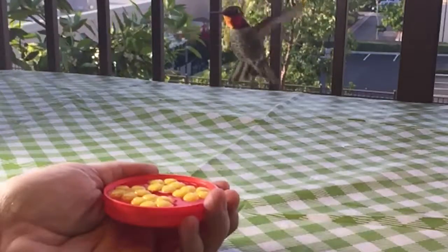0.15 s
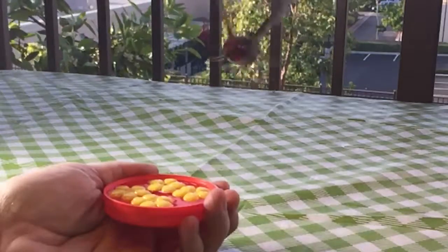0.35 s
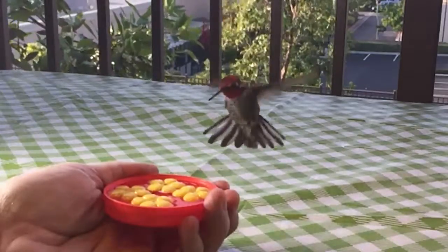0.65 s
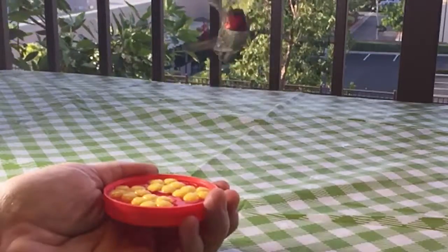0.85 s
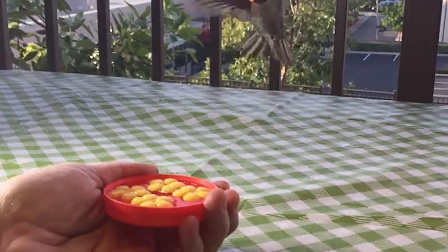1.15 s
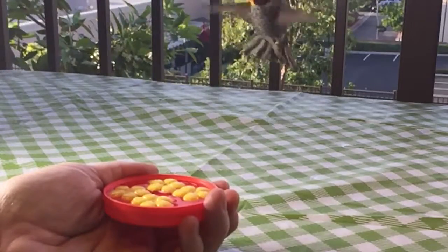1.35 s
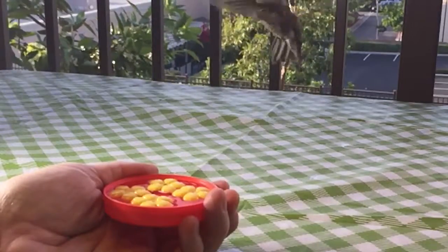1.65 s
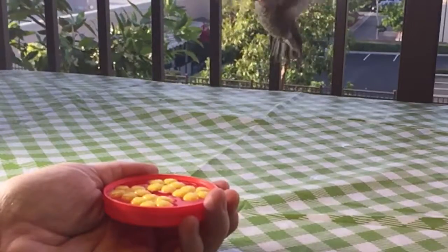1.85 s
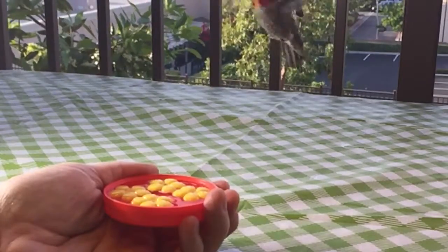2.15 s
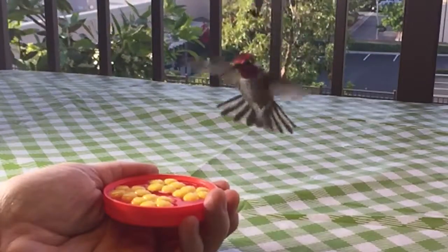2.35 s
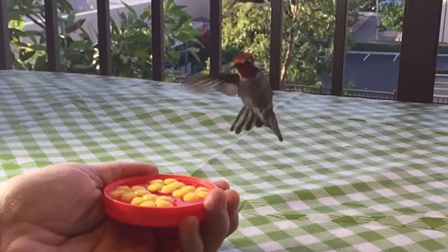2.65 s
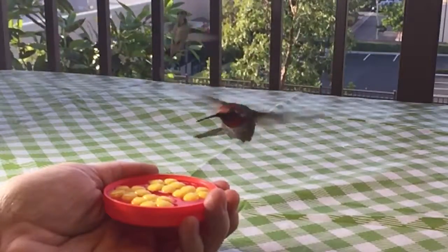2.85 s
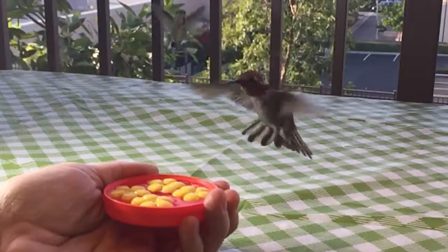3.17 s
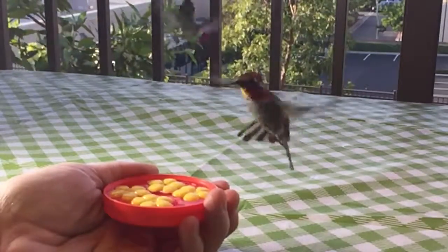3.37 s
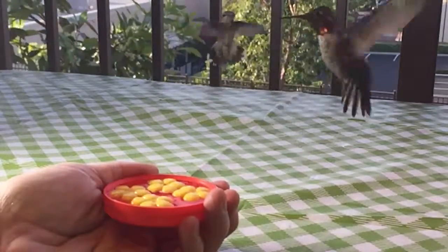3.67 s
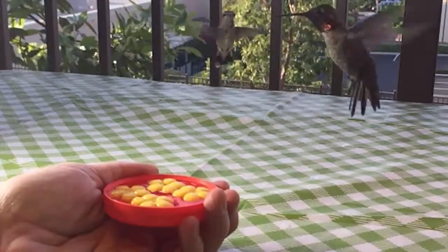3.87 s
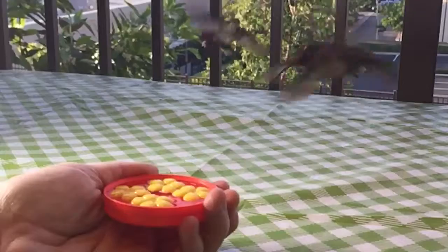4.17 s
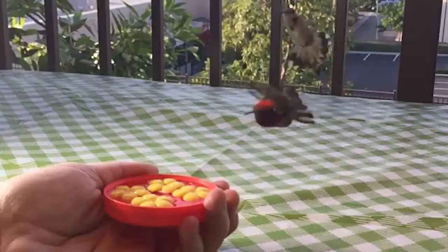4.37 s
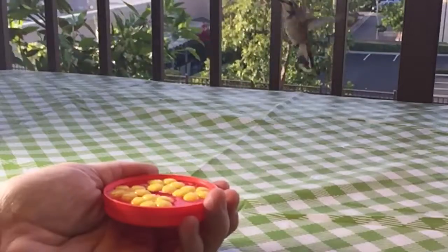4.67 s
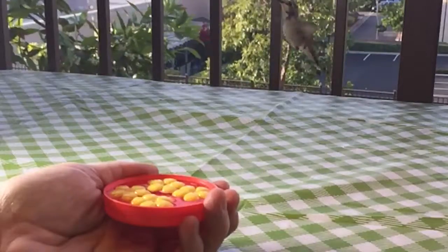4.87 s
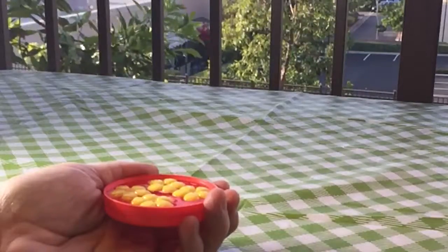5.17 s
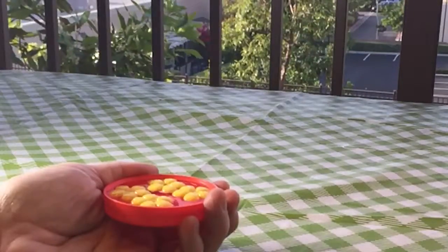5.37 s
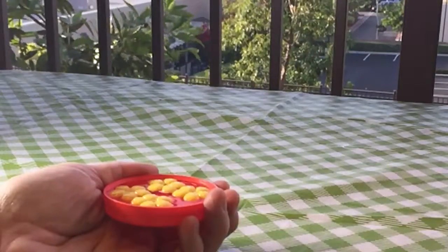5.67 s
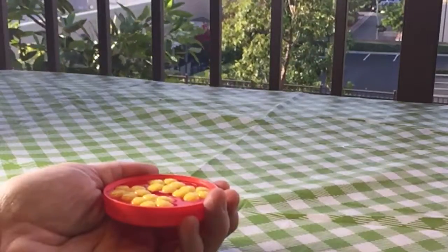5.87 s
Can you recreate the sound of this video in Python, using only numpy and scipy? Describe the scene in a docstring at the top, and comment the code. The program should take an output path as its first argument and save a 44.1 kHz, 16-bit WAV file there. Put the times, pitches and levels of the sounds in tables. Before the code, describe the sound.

Two hummingbirds hover close to the microphone on a balcony, their wings making a low, throbbing hum that swells and fades for all six seconds. They give very short, sharp, falling chips with a slight echo: three in the first half second, a few softer ones after that, then strong ones at about 2.3 and 2.8 seconds and a weaker one at 3.5. Hard turns throw brief thumping flutters and puffs of air between 0.5 and 1 second, and near 2.4, 3 and 3.6 seconds. The loudest chip comes at 4.3 seconds, followed by a dry feather tick and a fluttering whoosh as one bird darts past, peaking around 4.5. Two more flutters follow just after 5 seconds, and the hum turns a little buzzier. Distant traffic rumbles softly throughout, with very faint songbird peeps in the last second.

```python
"""A sharp chip and a hum of wings, right at the microphone: two hummingbirds spar over a hand-held
feeder on a balcony table. Each wing stroke pushes the air and makes the hum; hard turns throw
thumps and puffs of air, and one bird darts past with a whoosh. They scold with very short falling
whistles that echo off the table and walls. Distant traffic and a far songbird lie behind."""
import sys
import numpy as np
from scipy import signal
from scipy.fft import rfft, irfft, next_fast_len
from scipy.io import wavfile
from scipy.ndimage import uniform_filter1d, map_coordinates

SR = 44100
rng = np.random.default_rng(int(sys.argv[2]) if len(sys.argv) > 2 else 0)


def wav_out(sig):
    """Save sig, one row per channel (or a flat mono array), as 16-bit PCM at SR to the path in sys.argv[1]."""
    wavfile.write(sys.argv[1], SR, np.round(np.clip(np.atleast_2d(sig).T, -1, 1) * 32767).astype(np.int16))


N = 265305

# Distant streets, heard from the balcony. Each row: time in seconds, level in dB.
STREET_LEVEL = [(0, -47.5), (1.7, -50), (3.1, -49), (4.2, -48.5), (4.9, -49), (6.02, -49.5)]
# A far songbird. Each row: start in seconds, length in seconds, mid pitch in Hz, relative level in dB.
PEEPS = [(5.257, 0.022, 3500, -70), (5.368, .03, 4000, -71), (5.665, 0.025, 3750, -69),
         (5.745, .022, 3680, -72), (5.83, 0.02, 4000, -65.5)]
# The balcony's echo. Each row: frequency in Hz, seconds to die away by 60 dB.
BALCONY_T60 = [(300, 0.16), (4000, 0.33), (8000, 0.23), (15000, 0.13)]

# Spectra. Each row: frequency in Hz, relative level per Hz in dB.
TRAFFIC_SPECTRUM = [(20, -30), (33, -33), (50, -5), (100, -1), (200, 1.5), (310, -2), (430, -12.5),
                    (540, -14), (760, -12.5), (1000, -10.5), (1650, -18), (2500, -30.5), (4000, -35.5),
                    (6300, -40.5), (10000, -43), (15000, -45)]  # rumble and tyre noise
EDDY_SPECTRUM = [(20, -38), (35, -4.5), (52, -0.5), (80, 0), (130, 1), (200, 0.5), (320, -6.5), (500, -23),
                 (900, -22.5), (2000, -47), (5000, -54.5)]  # low eddies shed by the wings
SLAP_SPECTRUM = [(150, -27), (300, -0.5), (420, 1.5), (560, -7), (900, -30), (2000, -50)]  # the brighter part of the thrown air
FEATHER_SPECTRUM = [(300, -28), (700, 16.5), (1400, 12.5), (2500, 6), (5000, 1.5), (8500, 2), (10500, -1.5),
                    (15000, -0.5)]  # air swishing through feathers
THUMP_SPECTRUM = [(25, -39), (50, -1), (105, 4), (160, 6), (220, 2), (280, -6), (420, -11.5), (600, -22),
                  (1000, -49), (2500, -79), (6000, -120)]  # a hard wingbeat

# The hovering bird's pace. Each row: time in seconds, strokes a second (two to a wingbeat).
STROKE_RATE = [(0, 97), (.9, 93.5), (1.02, 94.7), (1.3, 94.4), (2.2, 97.4), (2.7, 92.4), (4.2, 93),
               (4.68, 98), (5.2, 94.2), (5.5, 94.3), (6.02, 94.4)]
# Its hum at the microphone. Each row: time in seconds, level in dB.
TONE_LEVEL = [(0, -46), (.09, -38.5), (.55, -44), (.68, -44.5), (.9, -42.5), (1.42, -55), (1.52, -42.5),
              (1.9, -46.5), (2.28, -47), (2.48, -50), (2.65, -45.5), (2.76, -48.5), (3.02, -46), (3.2, -50),
              (3.6, -45), (3.7, -57), (4.35, -52), (4.55, -46), (4.65, -40), (4.76, -58), (5.15, -48.5),
              (5.65, -58.5), (6.02, -48)]  # the stroke tone fades as the bird draws away
OCTAVE_LEVEL = [(0, -49), (.22, -57), (.33, -43), (.45, -58), (.72, -50), (.94, -39), (1.02, -53.5),
                (1.2, -45), (1.4, -44), (1.76, -67.5), (2.08, -45), (2.3, -61), (2.66, -43.5), (2.92, -49),
                (3.152, -57.5), (3.35, -46.5), (3.6, -49.5), (3.75, -57), (4.22, -58), (4.35, -41),
                (4.58, -41), (4.645, -45), (4.71, -36), (4.84, -54.5), (4.98, -41), (5.11, -40.5),
                (5.18, -52), (5.3, -45), (5.5, -49.5), (5.68, -42.5), (5.92, -39.5), (6.02, -43)]  # its octave comes and goes as the bird turns
BUZZ_LEVEL = [(0, -61.5), (1.65, -67), (1.95, -63), (2.25, -61.5), (2.9, -58.5), (4.2, -67), (5.2, -58),
              (5.6, -47.5), (5.88, -57.5), (6.02, -50)]  # the upper buzz
# Sharp turns. Each row: time of the hardest wingbeat in seconds, half length in seconds, wingbeats
# a second, relative levels of thrown air, thump and swish in dB, thump tilt in dB per octave,
# upstroke against downstroke in dB.
SHARP_TURNS = [(0.56, 0.037, 48, -47, -46, -68, -1.5, -18), (0.782, 0.03, 52, -47.5, -38.5, -61, 2.5, -28),
               (.931, 0.04, 55, -43.5, -48, -64.5, 4, -11), (2.388, 0.042, 43.4, -49, -38.5, -68, -5, -15),
               (2.937, 0.038, 52, -49, -36, -62.5, -2, -20), (3.002, 0.022, 46, -71, -36.5, -87, -7, -10),
               (3.579, 0.054, 43.6, -48.5, -44, -71.5, 0.5, -17),
               (3.684, 0.041, 44, -68, -66, -67.5, -2, -10), (5.097, 0.086, 44, -52.5, -53, -71.5, 5, -4),
               (5.275, 0.027, 45.7, -47, -38.5, -77, -3, -10)]
# One bird darts past the feeder. Each row: time in seconds, wingbeats a second, relative levels of
# thrown air, thump and swish in dB, upstroke against downstroke in dB.
DART = [(4.28, 56, -64, -66, -70, 1), (4.385, 57, -48, -44, -61.5, -9), (4.44, 57.5, -42, -35.5, -54.5, -6),
        (4.485, 54, -48, -39, -64, -8.5), (4.53, 52.4, -38, -32.5, -54.5, -16),
        (4.56, 52, -45, -36.5, -58, -10), (4.6, 51, -41.5, -36, -57, -8), (4.68, 54.3, -45, -61, -63.5, -3),
        (4.78, 49.8, -63, -57, -77, -4)]
# Feather flicks. Each row: start in seconds, level in dB.
FLICKS = [(3.428, -55), (4.39, -42.5)]
# A snapped quill's ring. Each row: frequency in Hz, relative level in dB, seconds to fall 60 dB.
QUILL_MODES = [(3540, -4.5, .02), (6030, -7, 0.023), (8900, -10, .012)]
# Scolding chips; overlapping ones are the two sides of the syrinx, or both birds at once.
# Each row: start and length in seconds, top and end pitch in Hz, level in dB, place and width of
# the crest as shares of the length, relative levels of octave, rasp and echo in dB.
CHIPS = [(-.002, 0.014, 9780, 3500, -36.5, 0.54, 0.47, -9, -15, -16),
         (0.118, 0.011, 9680, 4620, -30.5, 0.53, 0.26, -15, -28, -17.5),
         (0.4727, 0.0091, 10100, 3200, -26.5, 0.47, 0.47, -13, -20, -16.5),
         (0.6875, 0.013, 7400, 2780, -49, 0.66, 0.45, -15, -9, -7),
         (1.367, 0.011, 6560, 3507, -45.5, 0.55, 0.38, -17, -8.5, -15.5),
         (1.962, 0.01, 6630, 2700, -41.5, 0.5, 0.2, -20, -13.5, -15),
         (2.3252, 0.0099, 10050, 3740, -23.5, 0.57, 0.26, -9, -28, -16),
         (2.6572, 0.0112, 7300, 3580, -44, 0.6, 0.35, -14, -15, -12),
         (2.8302, 0.0084, 9365, 3950, -27, 0.61, 0.42, -11, -18, -15.5),
         (2.8306, 0.0079, 11200, 6260, -39, 0.2, 0.3, -30, -23, -17),
         (3.4612, 0.0096, 7440, 3600, -38.5, 0.5, 0.5, -9, -20, -13.5),
         (4.2784, 0.0093, 9796, 3480, -18.5, 0.74, 0.07, -8.5, -27, -17),
         (4.2788, 0.0077, 11930, 5700, -29.5, 0.63, 0.55, -30, -23, -13),
         (4.288, 0.0102, 7100, 3330, -41, 0.8, 0.8, -22, -25, -21)]

FLUTTER_DB, RUSTLE_DB = 1.0, 1.0  # quick unevenness of the strokes and of the swish


def amp(db):
    """Decibels to gain."""
    return 10 ** (np.asarray(db) / 20)


def unit(x):
    """Scale to rms 1."""
    return x / np.sqrt(np.mean(x ** 2) + 1e-20)


def along(points, hz):
    """Read (Hz, value) points on a log frequency axis."""
    knots_hz, values = np.transpose(points)
    return np.interp(np.log(hz + 1), np.log(knots_hz + 1), values)


def curves(rows):
    """One value per sample for each column after the time."""
    times, *columns = np.transpose(rows)
    return [np.interp(np.arange(N) / SR, times, column) for column in columns]


def wobble(rate):
    """A smooth random curve, rate knots a second."""
    return map_coordinates(rng.standard_normal(int(N * rate / SR) + 4), [np.arange(N) * rate / SR])


def filtered(x, response):
    """Filter x by a gain that is a function of frequency."""
    size = next_fast_len(N + SR // 2)
    return irfft(rfft(x, size) * response(np.fft.rfftfreq(size, 1 / SR)), size)[:N]


def coloured(x, spectrum):
    """Shape x by a spectrum, at rms 1."""
    return unit(filtered(x, lambda hz: amp(along(spectrum, hz))))


def phase_of(hz):
    """Running phase in radians."""
    return 2 * np.pi * np.cumsum(hz) / SR


def highpass(x, order, hz):
    """Cut the lows below hz."""
    return signal.sosfilt(signal.butter(order, hz, "high", fs=SR, output="sos"), x)


def add(track, start_s, sound):
    """Mix a sound into the track."""
    at = round(start_s * SR) + np.arange(len(sound))
    inside = (at >= 0) & (at < N)
    track[at[inside]] += sound[inside]


def traffic():
    """Rumble and tyre noise of distant streets, drifting in patches."""
    bands = signal.stft(rng.standard_normal(N), nperseg=1024)[2]
    patches = uniform_filter1d(rng.standard_normal(bands.shape), size=3, axis=0)
    patch_db = 1.7 * unit(uniform_filter1d(patches, size=5, axis=1))
    noise = signal.istft(bands * amp(patch_db), nperseg=1024)[1][:N]
    level_db = curves(STREET_LEVEL)[0] + 0.6 * wobble(9)
    return amp(level_db) * coloured(noise, TRAFFIC_SPECTRUM)


def wall_echo():
    """The balcony's diffuse tail, at energy 1; each frequency dies at its own speed."""
    hz, t, bands = signal.stft(rng.standard_normal(SR // 2), SR, nperseg=256)
    decay = amp(-60 * t / along(BALCONY_T60, hz)[:, None])
    tail = signal.istft(bands * decay, SR, nperseg=256)[1]
    return unit(tail) / np.sqrt(len(tail))


def balcony(call, echo_db, scatter_t60_s=0.05):
    """Table and railing throw a call back at once, then the walls answer with a short tail."""
    t = np.arange(SR // 50) / SR
    scatter = rng.standard_normal(len(t)) * amp(-60 * t / scatter_t60_s)
    response = np.zeros(N)
    response[0] = 1  # straight to the microphone
    add(response, rng.uniform(0.0006, 0.0021), amp([-8]))  # one bounce off the table top
    add(response, 0.0005, amp(-13.5) * scatter / np.linalg.norm(scatter))
    add(response, 0.007, amp(echo_db) * wall_echo())
    return signal.fftconvolve(call, response[:SR // 2])


def songbird(rise=0.18):
    """Faint rising peeps from far off, as much echo as direct sound."""
    track = np.zeros(N)
    for start_s, length_s, hz, db in PEEPS:
        progress = np.linspace(0, 1, int(length_s * SR))
        phase = phase_of(hz * (1 + rise * (progress - 0.5)))
        add(track, start_s, amp(db) * np.sin(np.pi * progress) * np.sin(phase))
    return amp(-4) * (track + signal.fftconvolve(track, wall_echo())[:N])


def downwash(stroke_phase, leave_s=4.64, fade_db_per_s=6):
    """Each hovering wingbeat sheds eddies and a faint swish, which fades as the birds rise away."""
    gone_s = np.maximum(np.arange(N) / SR - leave_s, 0)
    wingbeat = np.abs(np.cos(stroke_phase / 4)) ** 4  # crests every second stroke
    eddies = coloured((1.1 + wingbeat) * rng.standard_normal(N), EDDY_SPECTRUM)
    rustle = amp(RUSTLE_DB * wobble(70)) * rng.standard_normal(N)
    swish = coloured((2.1 + wingbeat) * rustle, FEATHER_SPECTRUM)
    return amp(-52.5 + 0.52 * wobble(6.15)) * eddies + amp(-70.5 - fade_db_per_s * gone_s) * swish


def feather_flicks(tick_t60_s=0.0071):
    """Dry ticks of feathers snapping against each other, with a tiny ring of the quill."""
    track = np.zeros(N)
    t = np.arange(SR // 50) / SR
    ring = sum(amp(db - 60 * t / t60) * np.sin(2 * np.pi * hz * t) for hz, db, t60 in QUILL_MODES)
    for start_s, db in FLICKS:
        tick = amp(-60 * t / tick_t60_s) * rng.standard_normal(len(t))
        add(track, start_s, amp(db) * (ring + tick))
    return track


def partial(phase, db, waver_db):
    """One harmonic of a wing hum; it wavers as the bird bobs, and no two strokes are equal."""
    return np.sqrt(2) * amp(db + waver_db * wobble(12) + FLUTTER_DB * wobble(40)) * np.cos(phase)


def rival_hum(stroke_hz=104.1, drift=0.0249):
    """The second bird beats a little faster, so the two hums throb against each other."""
    phase = phase_of(stroke_hz * (1 + drift * wobble(6)))
    return (partial(phase, -57.5, waver_db=1.5)
            + partial(2 * phase, -60.5, waver_db=3.5)
            + partial(3 * phase, -80, waver_db=6.5))


def wing_hum(stroke_phase):
    """Close by, each fore and back stroke pushes the air once, giving a tone and its overtones."""
    tone_db, octave_db, buzz_db = (curves(rows)[0] for rows in (TONE_LEVEL, OCTAVE_LEVEL, BUZZ_LEVEL))
    return (partial(stroke_phase, tone_db, waver_db=1.5)
            + partial(2 * stroke_phase, octave_db, waver_db=1.8)
            + partial(3 * stroke_phase, buzz_db, waver_db=1.5)
            + partial(4 * stroke_phase, buzz_db - 9, waver_db=5)
            + partial(5 * stroke_phase, buzz_db - 19.5, waver_db=3.5))


def wing_thumps(beats, tilt_db, upstroke_db):
    """Hard wingbeats at rms 1: a thump on each downstroke and another on the upstroke between."""
    down, up = (np.diff(np.floor(count), prepend=np.floor(count[0])) for count in (beats, beats + 0.5))
    pushes = -(down + amp(upstroke_db) * up)
    colour = lambda hz: amp(along(THUMP_SPECTRUM, hz) + tilt_db * np.log2(np.clip(hz, 50, 400)))
    return unit(filtered(pushes, colour))


def pulsing(cycles, depth):
    """A gain of rms 1 that peaks once a cycle."""
    return unit(1 + depth * np.exp(-2 * (1 - np.cos(2 * np.pi * cycles))))


def sharp_turns(recovery=1.08, steepness=1.63, swish_lead_s=0.0047):
    """Each turn builds fast and eases a little more slowly. Gives thumps, air gain and swish gain."""
    t = np.arange(N) / SR
    thumps, air_gain, swish_gain = np.zeros((3, N))
    for peak_s, half_s, rate, air_db, thump_db, swish_db, tilt_db, upstroke_db in SHARP_TURNS:
        offset = (t - peak_s) / half_s
        from_peak = np.where(offset < 0, -offset, offset / recovery)
        effort = np.exp(-np.minimum(from_peak, 10) ** steepness)
        beats = rate * (t - peak_s)
        strokes = effort * pulsing(beats + rate * swish_lead_s, depth=1.7)
        thumps += amp(thump_db) * effort * wing_thumps(beats, tilt_db, upstroke_db)
        air_gain += amp(air_db) * strokes
        swish_gain += amp(swish_db) * strokes
    return thumps, air_gain, swish_gain


def dart(nearest_s=4.536, jitter=0.035):
    """A bird shoots past the microphone and its hum falls. Gives thumps, air gain and swish gain."""
    t = np.arange(N) / SR
    rate, air_db, thump_db, swish_db, upstroke_db = curves(DART)
    beats = np.cumsum(rate * (1 + jitter * wobble(45))) / SR
    beats -= np.interp(nearest_s, t, beats)  # a downstroke lands at the closest point
    passing = (t > DART[0][0]) & (t < DART[-1][0])
    strokes = passing * pulsing(2 * beats, depth=0.55)  # both strokes swish alike
    thumps = amp(thump_db) * passing * wing_thumps(beats, tilt_db=-0.5, upstroke_db=upstroke_db)
    return thumps, amp(air_db) * strokes, amp(swish_db) * strokes


def flurries():
    """In the turns and the dart, the same wingbeats thump, throw air and swish through the feathers."""
    thumps, air_gain, swish_gain = np.add(sharp_turns(), dart())
    eddies, slap, feathers = (coloured(rng.standard_normal(N), spectrum)
                              for spectrum in (EDDY_SPECTRUM, SLAP_SPECTRUM, FEATHER_SPECTRUM))
    rustle_db = RUSTLE_DB * wobble(70) + 1.9 * wobble(900)  # the barbs add a fine grain
    swish = amp(5) * swish_gain * unit(amp(rustle_db) * feathers)
    thrown_air = air_gain * (eddies + amp(-8) * slap)
    return amp(FLUTTER_DB * wobble(29.86)) * thumps + thrown_air + swish


def chip(length_s, top_hz, end_hz, crest, width, octave_db, rasp_db):
    """A whistle holds briefly, then plunges about an octave; low, soft ones arch up and hold longer."""
    sharp_hz, soft_hz = 9630, 6600
    progress = np.linspace(0, 1, int(length_s * SR))
    softness = np.clip((sharp_hz - top_hz) / (sharp_hz - soft_hz), 0, 1)
    hold = 2.19 + 1.04 * softness  # the lower, the later the pitch drops
    plunge_hz = top_hz + (end_hz - top_hz) * progress ** hold
    scoop = 1 - 0.11 * softness * np.exp(-progress / 0.17)
    phase = phase_of(plunge_hz * scoop)
    edges = np.clip(progress / 0.17, 0, 1) * np.clip((1 - progress) / 0.01, 0, 1)
    swell = 0.22 + 0.84 * np.exp(-((progress - crest) / width) ** 2)
    fade = 1 - 0.4 * progress ** 6
    # overtones and a dry rasp grow as the pitch drops
    third = amp(-19) * progress * np.sin(3 * phase) * (progress > 0.5)
    overtones = 2.26 * progress ** 2 * amp(octave_db) * (np.sin(2 * phase) + third)
    hiss = highpass(rng.standard_normal(len(progress)), order=4, hz=4000)
    rasp = amp(rasp_db) * (progress + 0.5) * hiss
    call = edges * swell * fade * (np.sin(phase) + overtones + rasp)
    return highpass(np.pad(call, (0, SR // 500)), order=6, hz=3300)  # the beak radiates few lows


def scolding():
    """The birds chip from a new place each time, so every call has its own echo."""
    track = np.zeros(N)
    for start_s, length_s, top_hz, end_hz, db, crest, width, octave_db, rasp_db, echo_db in CHIPS:
        call = chip(length_s, top_hz, end_hz, crest, width, octave_db, rasp_db)
        add(track, start_s, amp(db) * balcony(call, echo_db))
    return track


def scene():
    """One microphone by the feeder: wings up close, calls in the balcony's echo, streets far behind."""
    stroke_hz = curves(STROKE_RATE)[0] * (1 + 0.009 * wobble(14))
    stroke_phase = phase_of(stroke_hz)
    wings = wing_hum(stroke_phase) + rival_hum() + downwash(stroke_phase) + flurries() + feather_flicks()
    return (wings + scolding() + songbird() + traffic())[None]


def record(dry):
    """The microphone dulls the highest treble; the recorder keeps nothing above its band limit."""
    top_hz = 15400
    microphone = lambda hz: amp(along([(13500, -1.0), (top_hz, -4.0)], hz))
    band_limit = lambda hz: np.clip((top_hz - hz) / 400 + 0.5, 0, 1)
    return filtered(dry[0], lambda hz: microphone(hz) * band_limit(hz))[None]


dry = scene()
out = record(dry)
wav_out(out)
```